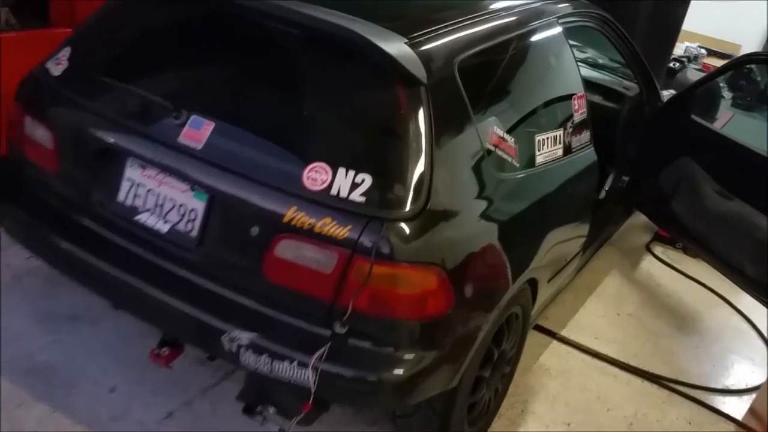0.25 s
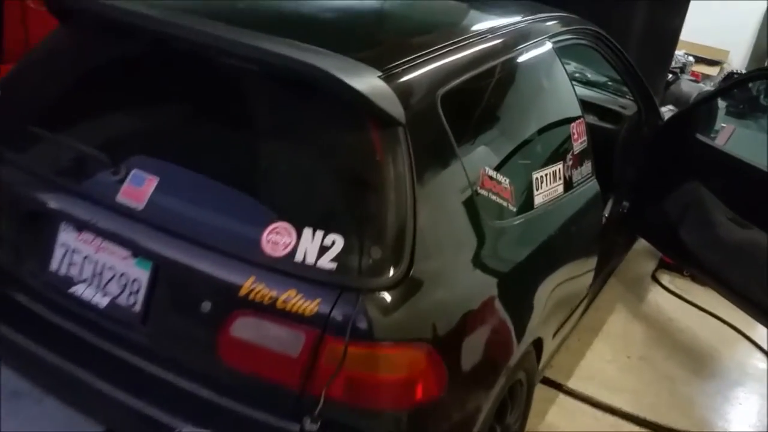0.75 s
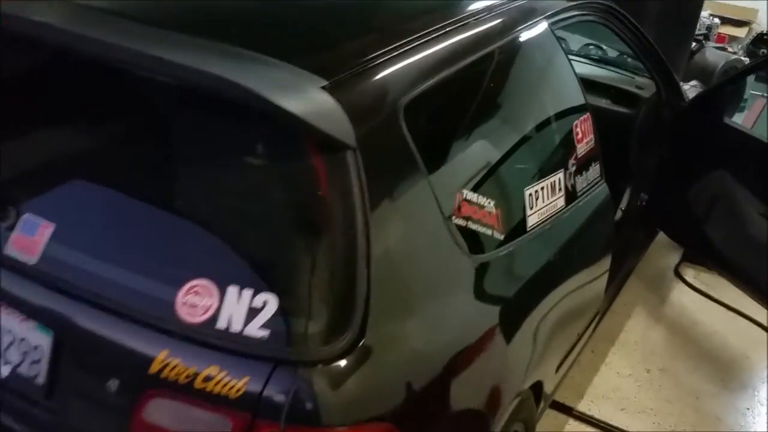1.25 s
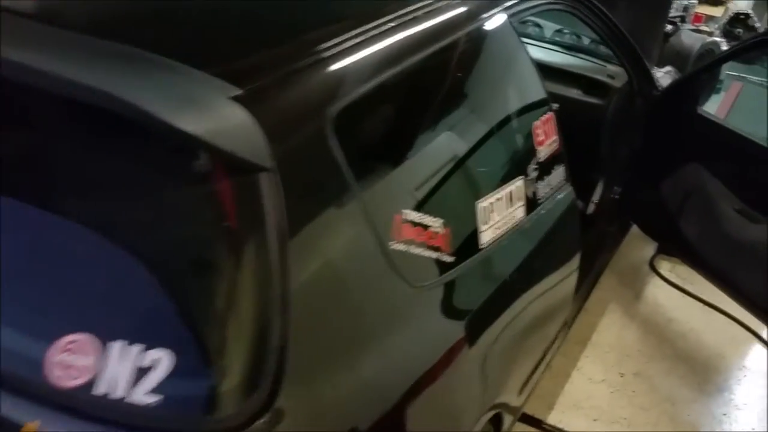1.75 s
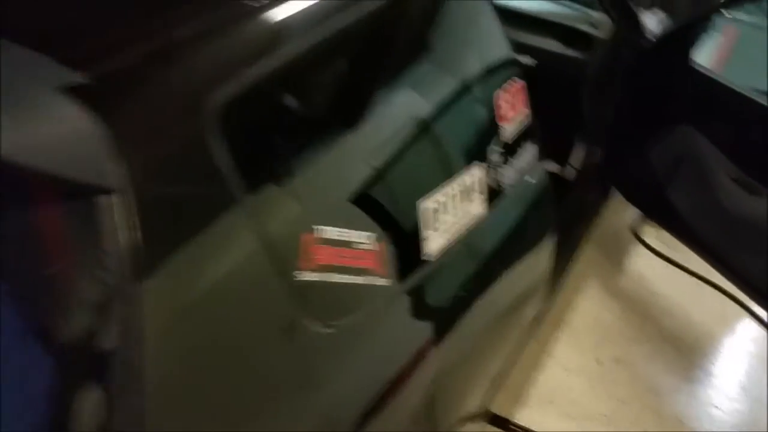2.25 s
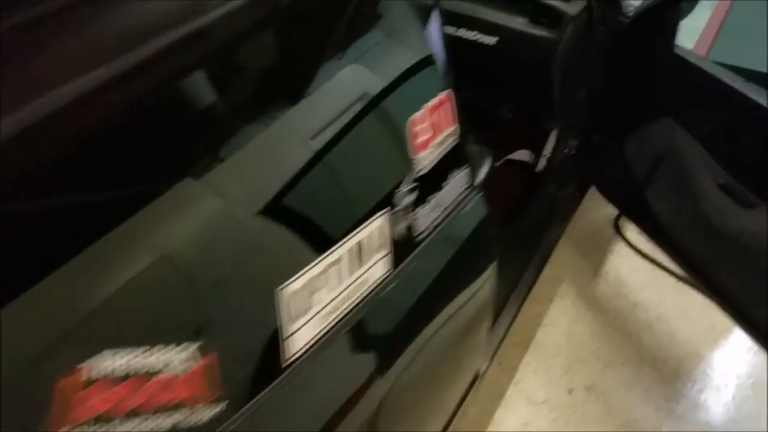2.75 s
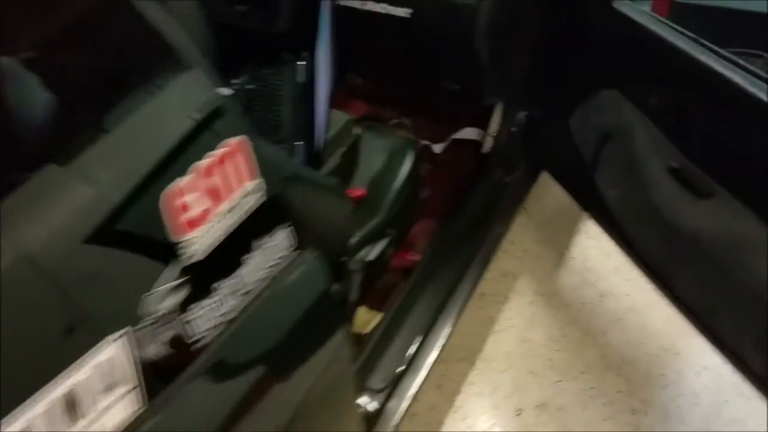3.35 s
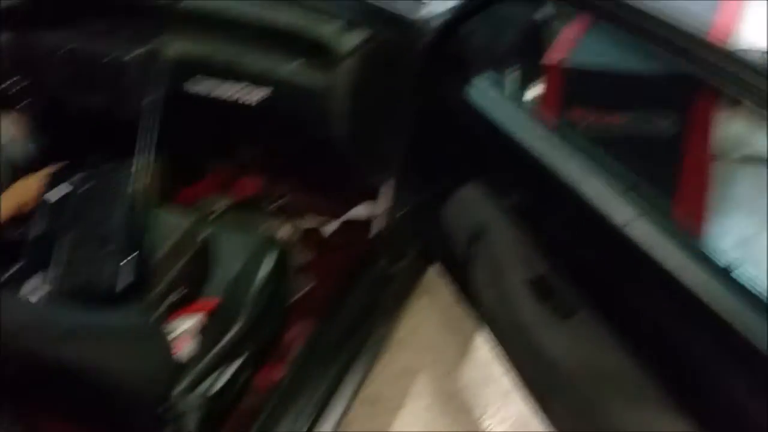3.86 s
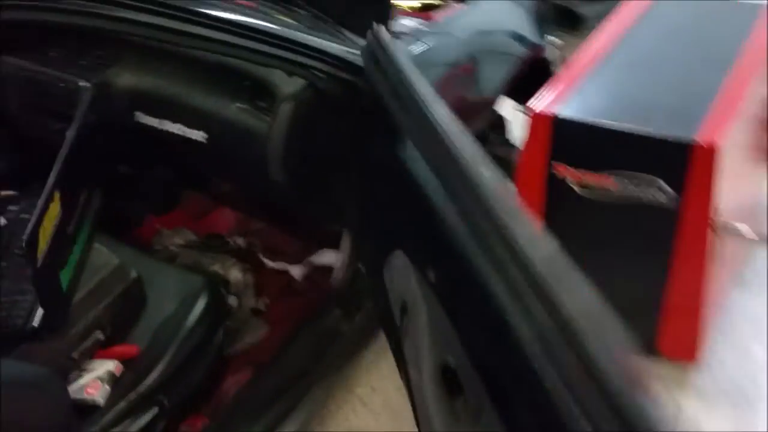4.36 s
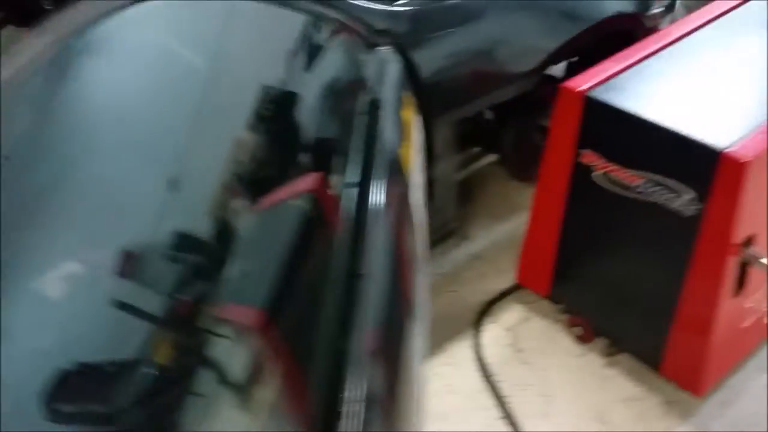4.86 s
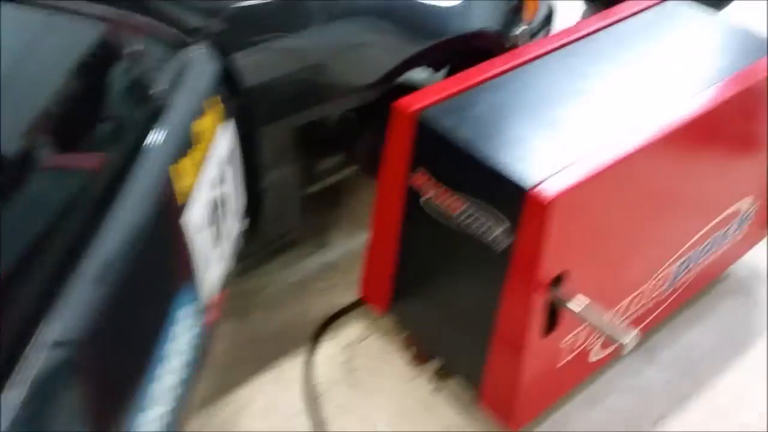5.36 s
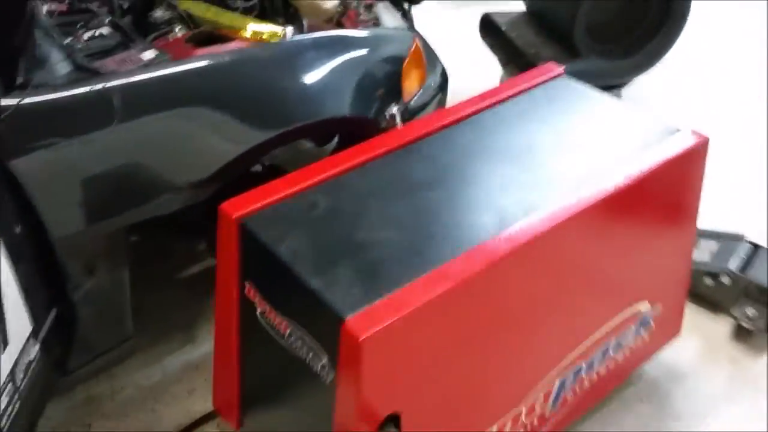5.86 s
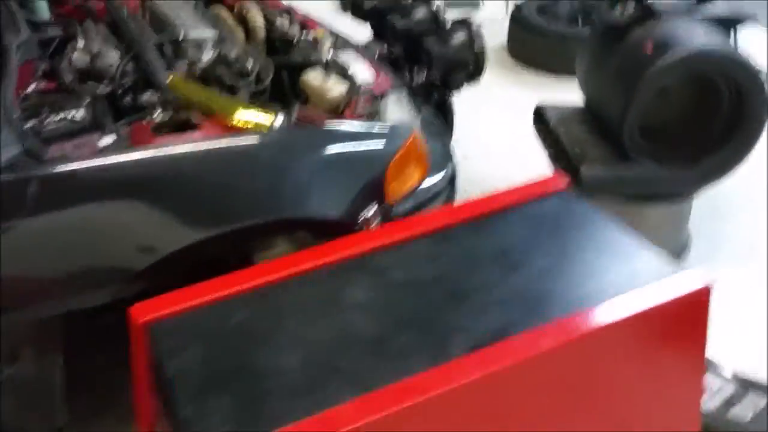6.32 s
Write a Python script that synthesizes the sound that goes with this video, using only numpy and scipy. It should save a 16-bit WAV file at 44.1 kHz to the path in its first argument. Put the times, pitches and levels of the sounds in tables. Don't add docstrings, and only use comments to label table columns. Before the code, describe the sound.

In a hard-surfaced workshop, a four-cylinder engine runs at an unsteady fast idle. Its deep, lumpy exhaust boom swells near the start, sags, swells again midway and returns at the end. Continuous cooling-fan air roars around it, becoming closer and hissier as a handheld phone moves from the tailpipe to the engine bay. The phone's automatic gain makes the air flutter with the throbs.

```python
import sys
import numpy as np
from scipy import signal
from scipy.fft import rfft, irfft, next_fast_len
from scipy.io import wavfile
from scipy.ndimage import uniform_filter1d, map_coordinates

SR = 44100
rng = np.random.default_rng(int(sys.argv[2]) if len(sys.argv) > 2 else 0)


def inscribe(sig):
    pcm = np.round(np.clip(np.atleast_2d(sig).T, -1, 1) * 32767)
    wavfile.write(sys.argv[1], SR, pcm.astype(np.int16))


def elevation(decibels):
    levels = np.asarray(decibels, float)
    return 10 ** (levels / 20)


N = 290619
LEAD = SR // 2

# (time [s], left-right level [dB], left lag [ms])
BEARING = [(0, .7, -.1), (.75, .7, .14), (1.25, .6, .42), (1.75, .4, .47), (2.25, .2, .42), (2.75, .6, .18),
           (3.75, 1.6, .11), (4.25, 1.9, .1), (4.75, 1.7, .11), (5.25, -.2, .07), (5.75, -.3, -.07),
           (6.59, -.1, -.11)]


def unit(x):
    return x / np.sqrt(np.mean(x ** 2) + 1e-20)


def along(points, hz):
    f, v = np.transpose(points)
    return np.interp(np.log(hz + 1), np.log(f + 1), v)


def curves(rows):
    s, *cols = np.transpose(rows)
    return [np.interp(np.arange(N) / SR, s, c) for c in cols]


def spots(rows):
    t = np.arange(N) / SR
    return sum(db * np.exp(-((t - s) / half) ** 2) for s, half, db in rows)


def passed(s, takes_s):
    return .5 + .5 * np.tanh((np.arange(N) / SR - s) / takes_s)


def wobble(rate_hz):
    coarse = np.arange(0, N + 64, 64)
    knots = rng.standard_normal(int(N * rate_hz / SR) + 4)
    return np.interp(np.arange(N), coarse, map_coordinates(knots, [coarse * rate_hz / SR]))


def filtered(x, response):
    m = next_fast_len(x.shape[-1] + SR // 2)
    spectrum = rfft(x, m) * response(np.fft.rfftfreq(m, 1 / SR))
    return irfft(spectrum, m)[..., :x.shape[-1]]


def resonance(hz, width_hz):
    return lambda f: 1j * f * width_hz / (hz * hz - f * f + 1j * f * width_hz)


def speed(lag_s=0):
    mean_hz, swing_hz, sag_hz_per_s = 11.059, 1.615, .024
    crest_s, hunt_period_s = .743, 2.969
    lean_rad, lean_phase_rad = .188, 2.237
    t = np.arange(N) / SR - lag_s
    angle = 2 * np.pi * (t - crest_s) / hunt_period_s
    swing = np.cos(angle + lean_rad * np.cos(angle + lean_phase_rad))
    return mean_hz - sag_hz_per_s * t + swing_hz * swing


def crank_cycles():
    rate_hz = speed()
    rate_hz = np.concatenate([np.full(LEAD, rate_hz[0]), rate_hz])
    return (np.cumsum(rate_hz) - LEAD * rate_hz[0]) / SR + .8


def firing(turns):
    # (multiple of cycle rate, level [dB], polarity)
    order = [(3, -16, 1), (4, 6, 1), (5, -1, 1), (6, -14, 1), (7, 6, -1), (8, 8, 1), (9, 10, 1),
             (10, 0, -1), (11, 8.5, 1), (12, 0, 1), (13, 1, -1), (14, -5, 1), (15, 2, 1), (16, 2.5, 1),
             (17, -6, 1), (18, 2, 1)]

    def uneven():
        return np.pad(wobble(7), (LEAD, 0), "edge")

    thumps = 0
    for k, db, sign in order:
        level = elevation(db + 3 + 1.1 * uneven())
        thumps = thumps + sign * level * np.cos(2 * np.pi * k * turns + .13 * uneven())
    return thumps


def boom_db():
    # (level at low speed [dB], rise above the knee [dB/Hz], change behind the open door [dB])
    boom_law = [(-52, 4, 5.5), (-28, 9.5, -9), (-20, -7, -5), (-42, 1.5, 2)]
    # (time [s], level [dB])
    load = [(0, -1.5), (.3, -.5), (.8, -0.5), (1.25, 1), (1.7, 1.5), (2.1, -.5), (2.6, 0.5), (3, 0.5),
            (3.3, 1), (3.9, -1.5), (4.2, 0), (4.5, 2.5), (4.8, -2.5), (5.6, -2), (6, -2), (6.3, 0),
            (6.59, 2)]
    # (time [s], half width [s], level [dB])
    deep_spots = [(.75, 0.8, 18.5), (2.2, 0.21, 4.5), (3.3, .15, 12.5), (4.2, .2, 5), (5.5, 0.28, 9),
                  (6.6, 0.26, 14)]
    # (time [s], half width [s], level [dB])
    upper_spots = [(.45, .3, 3), (1.2, .15, 6), (2.7, 0.17, 9), (3.75, 0.27, 5), (5, .65, 10),
                   (6.6, 0.34, -8.5)]
    knee_hz, pressure_lag_s = 11.446, .11
    fast_hz = np.maximum(speed(pressure_lag_s) - knee_hz, 0)
    shade = passed(4.22, .15)
    load_db, = curves(load)
    places_db = (spots(deep_spots), 0, 0, spots(upper_spots))
    return [db + rise * fast_hz + door_db * shade + place_db + load_db
            for (db, rise, door_db), place_db in zip(boom_law, places_db)]


def pipe_boom(thumps):
    # (centre [Hz], width [Hz])
    pipe = [(40.0, 23.9), (84.7, 19.8), (105.6, 11.3), (140.0, 71.5)]
    sound = np.zeros(N)
    for k, ((hz, width_hz), gain_db) in enumerate(zip(pipe, boom_db())):
        ring = filtered(thumps, lambda f: resonance(hz, width_hz)(f) * resonance(hz, 3 * width_hz)(f) ** 2)
        sound += (-1) ** k * elevation(gain_db) * ring[LEAD:]
    return sound


def panels(thumps):
    # (time [s], half width [s], level [dB])
    wing = [(0, 2, 3), (2.8, 0.2, 10.5), (4.5, .25, 11), (5.6, .8, 20)]
    # (time [s], half width [s], level [dB])
    door = [(4, 0.38, 19.2), (5, .3, 6), (6.1, .4, 9.1)]
    sound = np.zeros(N)
    for hz, level_db in ((152, -45.5 + spots(wing)), (225, -55 + spots(door))):
        hum = filtered(thumps, lambda f: resonance(hz, 11)(f) ** 2)
        sound += elevation(level_db) * unit(hum[LEAD:])
    return sound


def engine_block(turns):
    # (multiple of cycle rate, level [dB])
    block = [(20, -45), (22, -48.5), (24, -45), (26, -48), (30, -57.5), (34, -53), (38, -53), (41, -50),
             (42, -49.5)]
    # (time [s], half width [s], level [dB])
    block_spots = [(1.9, .3, 3.5), (2.75, .4, 6), (4, .3, 2), (6, .5, 5.5)]
    sound = 0
    for k, db in block:
        level = elevation(db + 1.5 + 2.3 * wobble(2.3))
        sound = sound + level * np.cos(2 * np.pi * k * turns[LEAD:] + .5 * wobble(3.114))
    return sound * elevation(spots(block_spots))


def exhaust():
    turns = crank_cycles()
    thumps = firing(turns)
    return engine_block(turns) + pipe_boom(thumps) + panels(thumps)


def placed(x):
    pan_db, lag_ms = curves(BEARING)
    shift = .33 * lag_ms * SR / 1000
    n = np.arange(N)
    return np.array([elevation(side * pan_db / 2) * np.interp(n - side * shift, n, x) for side in (1, -1)])


def rush(spectrum, patchy_db):
    # (frequency [Hz], side-mid level [dB])
    side_mid = [(60, -19), (110, -19), (200, -16), (380, -9), (700, -4), (1290, 1), (2380, -1), (4400, 0),
                (8120, 0), (15000, 1)]
    z = signal.stft(rng.standard_normal((2, N)), nperseg=512)[2]
    field = uniform_filter1d(rng.standard_normal(z.shape[1:]), size=3, axis=0)
    field = uniform_filter1d(field, size=22, axis=1)
    pair = signal.istft(z * elevation(patchy_db * unit(field)), nperseg=512)[1][:, :N]
    mid, side = filtered(pair, lambda hz: elevation(along(spectrum, hz)) * [1 + 0 * hz, elevation(along(side_mid, hz))])
    return np.array([mid + side, mid - side]) / np.std(mid)


def air_db():
    # (time [s], level [dB])
    near = [(0, -1.5), (1, 0), (1.7, 0), (2.45, 0), (2.9, 1), (3.3, 1), (4.1, 3), (5.1, 3), (5.9, 5),
            (6.59, 5.5)]
    # (level [dB], growth with nearness [dB/dB], change before the blower mouth [dB])
    air_law = [
        (-30.5, 1.23, .3),
        (-34, 0.83, 0.2),
        (-44, 1.52, -0.06),
        (-66.5, 1.5, 3.5),
        (-73, 2.4, 3),
    ]
    # (time [s], half width [s], level [dB])
    surges = [(1.1, .08, 1.5), (2.55, 0.042, 0.5), (2.84, 0.034, 2.5), (6.42, 0.052, 1)]
    near_db, = curves(near)
    surge_db = spots(surges)
    facing = passed(5.6, .12)
    return [db + grows * near_db + mouth_db * facing + surge_db for db, grows, mouth_db in air_law]


def blowers():
    # (frequency [Hz], level [dB/Hz])
    rumble = [(15, -39), (25, -15), (45, -17), (90, 6.5), (150, 2.5), (190, -3), (260, -3), (330, -12),
              (400, -9.5), (490, -9.5), (600, -12.5), (750, -21.5), (1000, -50.5)]
    # (frequency [Hz], level [dB/Hz])
    roar = [(360, -21.5), (620, -3), (774, -2), (1020, 0), (1120, -2), (1840, 0), (2500, -14),
            (3250, -18.5), (5500, -120)]
    # (frequency [Hz], level [dB/Hz])
    whoosh = [(1700, -8.5), (2300, -2.5), (2900, -3.5), (3400, -3.5), (3800, -2), (4220, -3.5), (4660, -4),
              (5900, -9.5), (7000, -19), (7800, -32), (8600, -60.5)]
    # (frequency [Hz], level [dB/Hz])
    hiss = [(6000, -41.5), (7800, -3), (9000, -2.5), (11300, 0.5), (13000, -2.5), (15600, -8.5),
            (16000, -58.5)]
    rumble_db, roar_db, whoosh_db, hiss_db = air_db()[:4]
    swell_db = .21 * wobble(7.7)
    low = elevation(rumble_db + 2.5 + swell_db) * rush(rumble, patchy_db=1.67)
    high = elevation(roar_db + swell_db + np.array([[.4], [-.4]])) * rush(roar, patchy_db=1.6)
    high += elevation(whoosh_db + swell_db) * rush(whoosh, patchy_db=1.04)
    high += elevation(hiss_db + swell_db) * rush(hiss, patchy_db=-.5)
    lag_ms = curves(BEARING)[1]
    early = np.arange(N) + np.round(lag_ms * SR / 1000).astype(int)
    direct = .25
    high[1] = np.sqrt(1 - direct ** 2) * high[1] + direct * high[0, np.clip(early, 0, N - 1)]
    pan_db = -2.5
    return low * elevation([[.5], [-.5]]) + high * elevation(np.array([[pan_db], [-pan_db]]) / 2)


def whistle():
    # (time [s], half width [s], level [dB])
    whistle_glimpse = [(0, 0.91, 4), (2.65, .35, 11), (4, 1, 5), (6.2, 0.54, 2)]
    # (time [s], half width [s], level [dB])
    duct_glimpse = [(3.9, .8, 8.5), (6, .4, 3)]
    bay = passed(5.05, .036)
    whistle_db = -53.5 + 11 * bay + spots(whistle_glimpse)
    duct_db = -47.5 + 2.5 * bay + spots(duct_glimpse) + 1.5 * wobble(3.3)

    def belt_bands(f):
        return resonance(3780, 300)(f) ** 2 + .6 * resonance(4700, 350)(f) ** 2

    belt = unit(filtered(rng.standard_normal((2, N)), belt_bands))
    duct = unit(filtered(rng.standard_normal(N), lambda f: resonance(492, 45)(f) ** 2))
    sheen = unit(filtered(rng.standard_normal((2, N)), lambda f: resonance(15000, 3500)(f) ** 2))
    sheen = elevation(air_db()[4]) * sheen * elevation([[-1.5], [1.5]])
    return elevation(whistle_db) * belt + elevation(duct_db) * duct + sheen


def scene():
    return placed(exhaust()) + blowers() + whistle()


def low_pass(x):
    return signal.sosfilt(signal.butter(12, 15620, fs=SR, output="sos"), x)


def record(dry):
    dry = dry / (1 + np.abs(dry / .95) ** 6) ** (1 / 6)
    power = np.mean(dry ** 2, axis=0)
    floor = elevation(-38)
    fast = np.abs(uniform_filter1d(uniform_filter1d(power, size=800), size=800)) + floor
    slow = np.abs(uniform_filter1d(power, size=SR // 3, mode="reflect")) + floor
    duck = (fast / slow) ** -.17
    middle = filtered(dry, lambda hz: 1 / (1 + (260 / (hz + 1)) ** 6))
    top = filtered(dry, lambda hz: 1 / (1 + (7500 / (hz + 1)) ** 6))
    mix = dry + middle * (duck - 1) + top * duck * (duck ** .6 - 1)
    return low_pass(mix)


dry = scene()
out = record(dry)
inscribe(out)
```